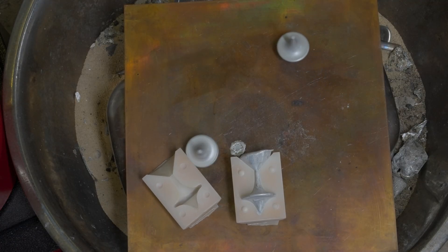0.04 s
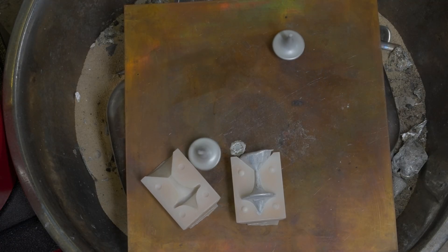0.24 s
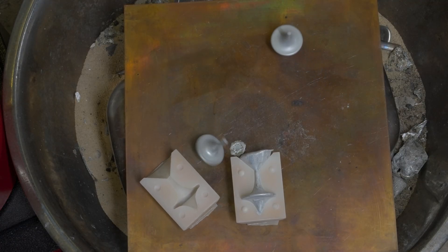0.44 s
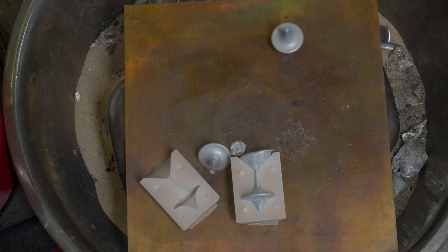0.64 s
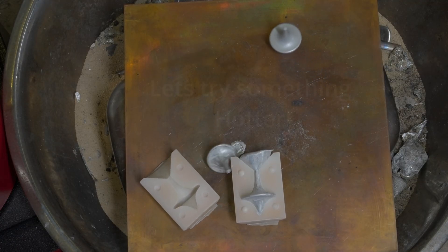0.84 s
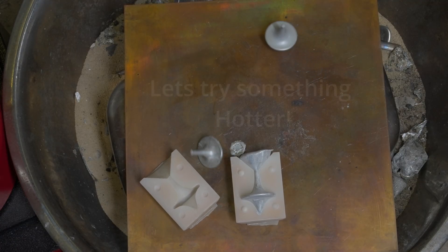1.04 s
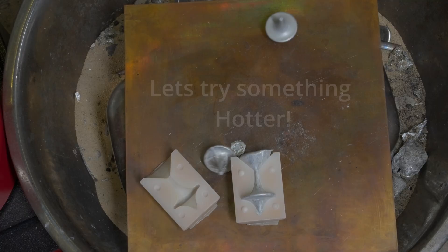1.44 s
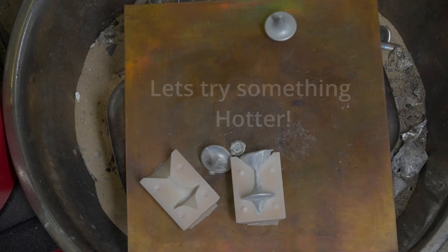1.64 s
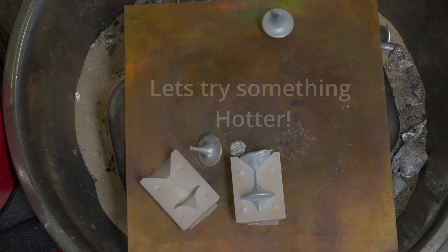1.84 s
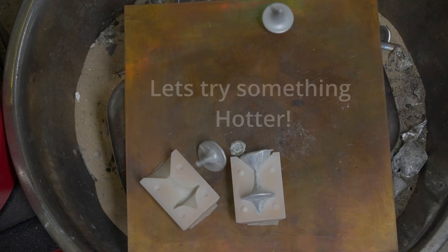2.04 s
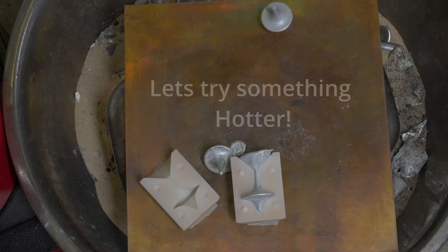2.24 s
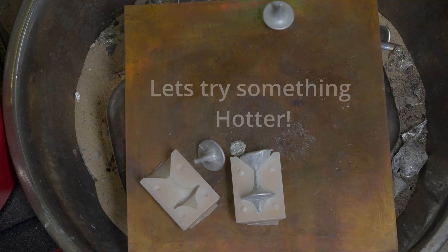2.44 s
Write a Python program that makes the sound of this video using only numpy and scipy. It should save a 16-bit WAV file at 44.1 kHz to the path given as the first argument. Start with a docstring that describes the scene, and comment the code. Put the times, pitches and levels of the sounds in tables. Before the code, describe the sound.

In a small, hard room, a little metal spinning top topples on a metal plate: light ringing knocks, a quick bright clatter, two final taps. It then ticks once and rocks very softly over quiet, steady air noise.

```python
"""A small metal piece knocks lightly, and one knock leaves it ringing with a clear ping. From 0.45 s it
clatters quickly on a metal plate, the hard contacts adding a bright snap. It settles with two last knocks
by 0.9 s, gives one tiny tick, then rocks with soft rubs from 1.7 s. Every blow rings the metal and is
smeared by a small, hard room; a low, steady rush of air and a faint hum lie underneath throughout."""
import sys
import numpy as np
from scipy import signal
from scipy.fft import rfft, irfft
from scipy.io import wavfile
from scipy.ndimage import uniform_filter1d

SR = 44100
rng = np.random.default_rng(int(sys.argv[2]) if len(sys.argv) > 2 else 0)


def wav_record(signal):
    """Record a signal, one row per channel, as 16-bit PCM in the file named by sys.argv[1]."""
    frames = np.transpose(np.atleast_2d(signal))
    bounded = np.clip(frames, -1, 1)
    # unit amplitude maps onto the largest positive 16-bit level
    quanta = np.round(bounded * 32767).astype(np.int16)
    wavfile.write(sys.argv[1], SR, quanta)


N = 114660

# The light knocks and the blows of the clatter. Each row: start in seconds, level in dB, then bass,
# treble and clink offsets in dB, decay time as a share of a free blow's.
KNOCK_HITS = [(0.001, -11.5, 2.5, 2.5, -16, 1), (0.0265, -8, 0, 3.5, -15, 0.74),
              (0.083, -18.5, 7, -14, -15, 1), (0.2125, -3.5, 2, -8, 10.5, 0.35),
              (0.219, -1.5, -0.5, 3, -14, 0.79), (0.282, -31, 21, 24, -22, 0.47),
              (0.362, -28.5, 22.5, 1, -22, 0.23), (0.375, -3.5, 5.5, 1.5, 13.5, 0.76),
              (0.383, -14, -10, 13, 6, 0.3), (0.415, -20, -5, 15, -6, 0.71),
              (0.431, -4.5, -1.5, 2, 6, 0.88), (0.806, -8, 1, 4, -13, 1), (0.877, -1, -11.5, 5, -21, 0.71)]
CLATTER_HITS = [(0.448, -0.5, -1, 1, -14, 0.9), (0.501, -4, -3, -1, -17, 0.47),
                (0.5096, -1, -3, 0, -16, 0.89), (0.543, 0.5, -6.5, -6, -6, 1),
                (0.584, -8, -11, -1.5, -7, 0.92), (0.6004, 4.5, -5, -3.5, -26, 1),
                (0.6424, 0, -8.5, -1.5, -23, 0.75), (0.660, -6, 0, 2.5, -17, 0.91),
                (0.689, 3, -4, 1, -24, 0.81), (0.711, -4.5, -2, -1, -20, 0.69),
                (0.733, -6.5, -2, -2.5, -12, 0.93)]
# Tone colour of each kind of impact. Each row: frequency in Hz, relative level in dB.
KNOCK_EQ = [(88, -25), (150, -39.5), (376, -1), (566, -6.5), (923, -0.5), (1120, -6), (1600, -6),
            (2020, -11.5), (3040, -12.5), (3490, -17), (5250, -25), (16000, -47)]
CLATTER_EQ = [(71, -42), (120, -9.5), (188, -46), (251, -13), (418, -1), (513, -9), (892, -5), (1120, -4.5),
              (1260, -5), (2020, -7.5), (2750, -1.5), (3450, -9), (4590, -8), (16000, -23)]
# Ringing modes of the metal. Each row: frequency in Hz, relative level in dB.
KNOCK_PARTIALS = [(425.3, -46), (893.6, -41.5), (1238, -42), (1615, -50), (1836, -43.5), (2261, -44.5),
                  (2719, -46.5), (2961, -45), (3138, -48.5), (5141, -59)]
CLATTER_PARTIALS = [(381, -10), (427, -7), (690, -7), (911, -3), (980, -5), (1276, 0), (1367, -6),
                    (1615, 0), (2164, -5), (2518, -6), (2641, -4), (2817, -2), (3203, -4), (3256, -6),
                    (3927, -8), (5112, -8), (5410, -11), (5874, -12), (6519, -9), (7430, -12), (7690, -14),
                    (8068, -14), (9580, -16), (10009, -13)]
# Soft rubs as the piece rocks. Each row: start and length in seconds, level in dB, pitch and width in Hz.
ROCKING_RUBS = [(1.722, 0.064, -59, 2370, 130), (1.986, 0.054, -48.5, 420, 120),
                (2.066, 0.11, -47, 434, 59.7), (2.483, 0.13, -50.5, 425, 90)]
# The room's tail after a free blow. Each row: frequency in Hz, seconds to fall by 60 dB.
ROOM_T60 = [(200, 0.71), (600, 0.29), (1700, 0.36), (4500, 0.35), (9000, 0.35), (15000, 0.21)]
# Tone colour of the air. Each row: frequency in Hz, relative level in dB.
AIR_EQ = [(12, -47), (20, -52), (34, -11), (55, -3), (90, -12), (126, -13.5), (145, -10.5), (171, -9.5),
          (202, -1), (260, -10), (283, -4), (344, -10), (430, -5.5), (537, -9), (888, -10.5), (1080, -11.5),
          (1280, -13.5), (2110, -19.5), (2420, -19.5), (3110, -23), (4600, -24.5), (5150, -26.5),
          (8740, -31), (10600, -39), (15700, -44)]
# Stereo width of the blows and the air. Each row: frequency in Hz, left-right correlation (1 is mono).
BLOW_CORRELATION = [(200, 1), (700, 0.99), (1300, 0.67), (2800, 0.34), (5500, 0.053), (14000, 0.059)]
AIR_CORRELATION = [(60, .999), (350, 0.98), (700, 0.86), (1400, 0.22), (2800, 0.12), (6000, 0.05),
                   (14000, 0.085)]
# Lean of the blows and the background. Each row: frequency in Hz, left minus right in dB.
BLOW_PAN = [(300, -0.2), (700, 0), (1400, 0.5), (2800, 0), (6000, -1.1), (14000, -0.5)]
AIR_PAN = [(60, 0.0), (240, 0), (950, 3.5), (3770, 1), (15000, 0)]

BASS_HZ, MID_HZ, TREBLE_HZ = 352, 1720, 8440
RING_DB, CLINK_DB = -3, -24.5  # against the crack of the blow
RING_T60_S, RING_SLOPE, RING_RISE_S = 0.22, 0.05, 0.0028  # a free blow's ring at 1 kHz; shorter higher up
EARLY_DB, EARLY_T60_S = -1, 0.34  # early part of the room's tail
SAME_ROOM_SHARE = 0.28  # part of the reflections that a run of blows has in common


def blows(hits, eq, partials):
    """Each blow is a crack in the room, ringing metal and a clink; harder contacts sound brighter."""
    hz, out = np.fft.rfftfreq(2048, 1 / SR), np.zeros((2, N))
    body = unit_rms(amp(curve(eq, hz)))
    common = reflections()
    for start, db, bass_db, treble_db, clink_db, decay in hits:
        echoes = np.sqrt(SAME_ROOM_SHARE) * common + np.sqrt(1 - SAME_ROOM_SHARE) * reflections()
        crack = coloured(room_click(echoes, decay), body)
        ring = amp(RING_DB) * metal_ring(partials, decay)
        hardness_db = curve([(BASS_HZ, bass_db), (MID_HZ, 0), (TREBLE_HZ, treble_db)], hz)
        add(out, start, coloured(crack + ring, amp(db + hardness_db)))
        add(out, start, amp(db + CLINK_DB + clink_db) * clink(centre_hz=4770, width_hz=380, decay=0.1))
    return out


def metal_ring(partials, decay, size=22050):
    """Dying modes of the metal, of energy 1; each blow shares its force out differently."""
    t, out = np.arange(size) / SR, np.zeros((2, size))
    for hz, db in partials:
        stereo_angle = np.arccos(curve(BLOW_CORRELATION, hz)) * rng.choice([-1, 1])
        phase = 2 * np.pi * rng.random() + np.array([[0], [stereo_angle]])
        t60 = decay * RING_T60_S * (hz / 1000) ** -RING_SLOPE
        struck_db = db + rng.standard_normal()
        out += amp(struck_db - 60 * t / t60) * np.sin(2 * np.pi * hz * t + phase)
    attack = np.tanh(t / RING_RISE_S) ** 2
    return unit_rms(out * attack) / np.sqrt(size)


def clink(centre_hz, width_hz, decay):
    """A short, bright ring of the piece itself: a click through one resonance."""
    tone = unit_rms(resonance(np.fft.rfftfreq(2048, 1 / SR), centre_hz, width_hz))
    return coloured(room_click(reflections(), decay), tone)


def snaps():
    """The harder a contact of the clatter, the stronger its short snap of top treble."""
    out = np.zeros((2, N))
    for start, db, _, treble_db, _, _ in CLATTER_HITS:
        snap_db = db - 2.5 + 1.6 * treble_db
        add(out, start, amp(snap_db) * clink(centre_hz=11800, width_hz=3100, decay=0.27))
    return out


def ping(start_s=0.213, hz=2962, t60_s=0.36, db=-37):
    """One knock leaves the piece ringing freely on a clear, longer note."""
    t = np.maximum(np.arange(N) / SR - start_s, 0)
    envelope = np.tanh(t / RING_RISE_S) * amp(db - 60 * t / t60_s)
    return envelope * np.sin(2 * np.pi * hz * t)


def rocking(tick_s=1.0615, tick_db=-27):
    """One tiny, high tick, then soft rubs that swell and fade as the piece rocks."""
    t, out = np.arange(N) / SR, np.zeros((2, N))
    add(out, tick_s, amp(tick_db) * clink(centre_hz=9400, width_hz=2300, decay=0.32))
    for start, length, db, hz, width in ROCKING_RUBS:
        swell = np.sin(np.pi * np.clip((t - start) / length, 0, 1))
        out += amp(db) * swell * narrow_noise(hz, width)
    return out


def reflections(size=22050, scatter_db=2.5, slaps=6, slap_span_s=0.015):
    """Dense echoes, unrelated left and right, with a few strong slaps from near surfaces."""
    echoes = rng.choice([-1., 1.], (2, size)) * amp(scatter_db * rng.standard_normal((2, size)))
    echoes = unit_rms(echoes * (rng.random((2, size)) < 1 / 5))
    for side in echoes:
        arrivals = (rng.random(slaps) * slap_span_s * SR).astype(int)
        side[arrivals] += rng.choice([-1, 1], slaps) * amp(-17) * np.sqrt(SR * slap_span_s)
    return echoes


def room_click(echoes, decay):
    """A click smeared by the room, of energy 1; each band dies at its own speed."""
    size = echoes.shape[1]
    hz, t, spectra = signal.stft(echoes, SR, nperseg=256)
    t = t / decay  # a damped blow runs through its tail faster
    late = amp(-60 * t / curve(ROOM_T60, hz)[:, None])
    early = amp(EARLY_DB - 60 * t / EARLY_T60_S)
    spectra = stereo(spectra * np.hypot(late, early), curve(BLOW_CORRELATION, hz)[:, None])
    tail = signal.istft(spectra, SR)[1][:, :size]
    return unit_rms(tail) / np.sqrt(size)


def air(drift_db=0.3):
    """A steady, low rush of air whose colour drifts faintly in patches."""
    hz, _, spectra = signal.stft(rng.standard_normal((2, N)), SR, nperseg=2048, noverlap=1536)
    patches = uniform_filter1d(rng.standard_normal(spectra.shape[1:]), size=12, axis=0)  # across pitch
    patches = unit_rms(uniform_filter1d(patches, size=8, axis=1))  # across time
    colour = amp(curve(AIR_EQ, hz)[:, None] + drift_db * patches)
    spectra = stereo(spectra, curve(AIR_CORRELATION, hz)[:, None]) * colour
    return unit_rms(signal.istft(spectra, SR, noverlap=1536)[1][:, :N])


def narrow_noise(centre_hz, width_hz):
    """Noise in one resonance, of rms 1."""
    band = resonance(np.fft.rfftfreq(N, 1 / SR), centre_hz, width_hz)
    return unit_rms(irfft(rfft(rng.standard_normal(N)) * band, N))


def resonance(hz, centre_hz, width_hz):
    """Gain of a steep peak, halved at width_hz either side."""
    return 1 / (1 + ((hz - centre_hz) / width_hz) ** 2)


def coloured(x, gain):
    """Minimum-phase EQ with the given gain from 0 Hz to SR / 2."""
    log_gain = np.log(np.maximum(np.r_[gain, gain[-2:0:-1]], 1e-5))
    taps = np.fft.ifft(np.exp(np.conj(signal.hilbert(log_gain)))).real
    return signal.fftconvolve(x, taps[None, :len(gain)], axes=1)[:, :x.shape[1]]


def stereo(spectra, correlation):
    """Turns two unrelated spectra into left and right with the given correlation."""
    mid = spectra[0] * np.sqrt((1 + correlation) / 2)
    side = spectra[1] * np.sqrt((1 - correlation) / 2)
    return np.array([mid + side, mid - side])


def panned(x, pan):
    """Leans each band to the left or right."""
    lean_db = curve(pan, np.fft.rfftfreq(N, 1 / SR))
    return irfft(rfft(x) * amp(np.array([lean_db, -lean_db]) / 2), N)


def amp(db):
    """Decibels to gain."""
    return 10 ** (np.asarray(db) / 20)


def unit_rms(x):
    """Scales to rms 1."""
    return x / np.sqrt(np.mean(x ** 2) + 1e-20)


def curve(points, hz):
    """Reads a table on a log-frequency axis."""
    point_hz, value = np.transpose(points)
    return np.interp(np.log(hz + 1), np.log(point_hz + 1), value)


def add(mix, start_s, sound):
    """Drops a stereo sound into the mix."""
    part = mix[:, round(start_s * SR):][:, :sound.shape[1]]
    part += sound[:, :part.shape[1]]


def scene():
    """Knocks, clatter and rocking over a bed of air and faint, wavering hum."""
    knocks = amp(2) * blows(KNOCK_HITS, KNOCK_EQ, KNOCK_PARTIALS)
    clatter = amp(11) * blows(CLATTER_HITS, CLATTER_EQ, CLATTER_PARTIALS)
    rush = amp(-45.5) * air()
    hum = amp(-62.5) * narrow_noise(centre_hz=212.3, width_hz=3.3)
    metal = knocks + ping() + clatter + snaps()
    return panned(metal, BLOW_PAN) + rocking() + panned(rush + hum, AIR_PAN)


def record(dry):
    """A steep high cut at 16050 Hz."""
    high_cut = signal.firwin(511, 16050, window=("kaiser", 9), fs=SR)
    return signal.oaconvolve(dry, high_cut[None], "same")


dry = scene()
out = record(dry)
wav_record(out)
```